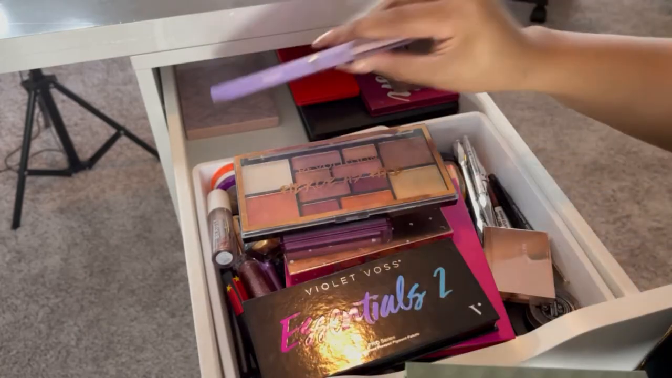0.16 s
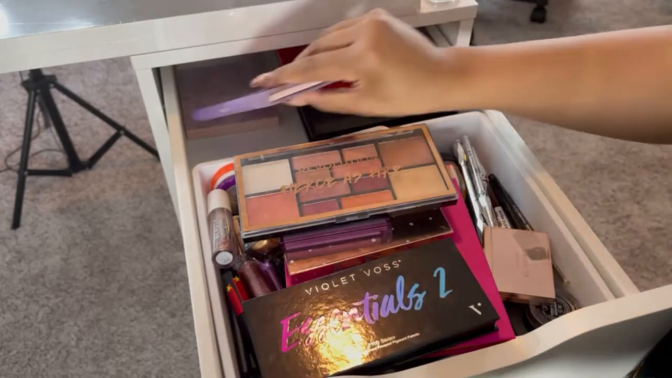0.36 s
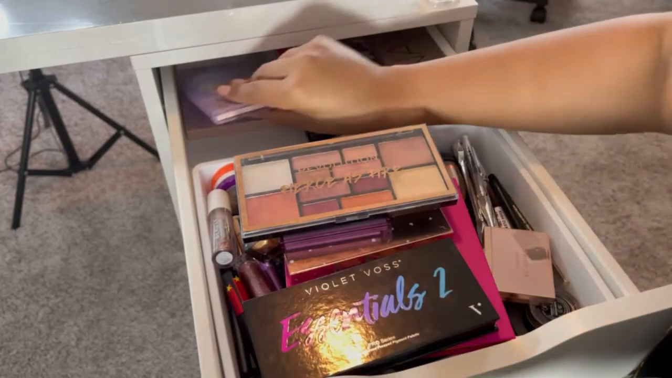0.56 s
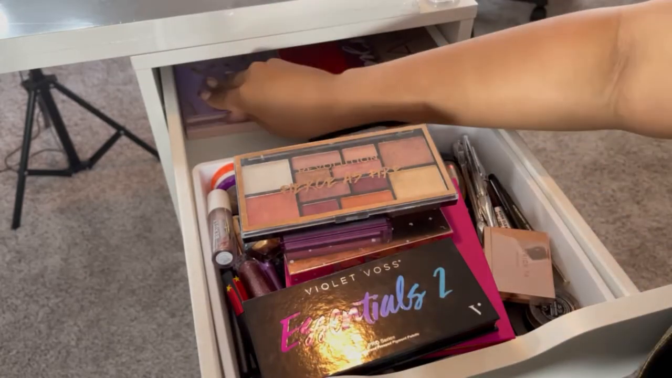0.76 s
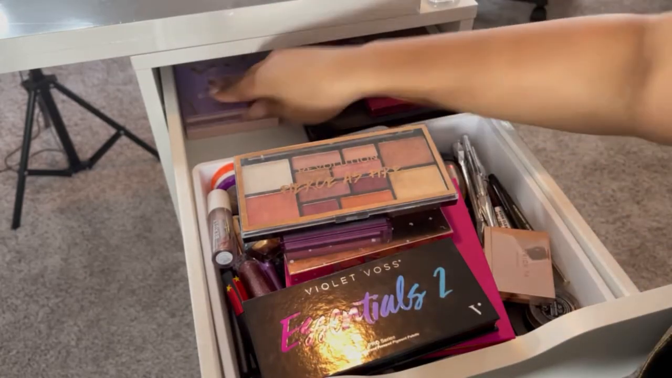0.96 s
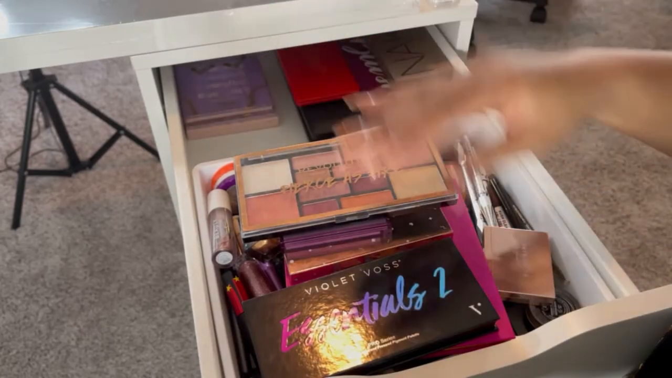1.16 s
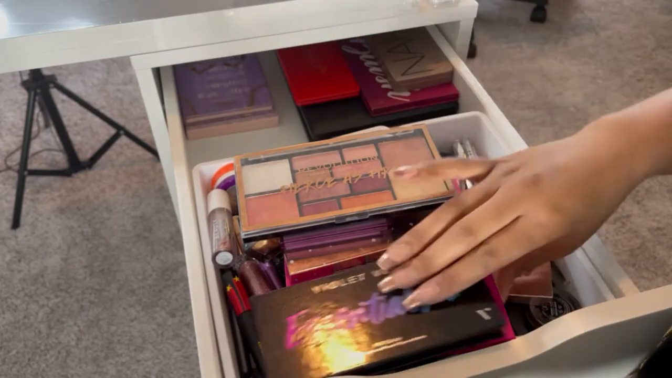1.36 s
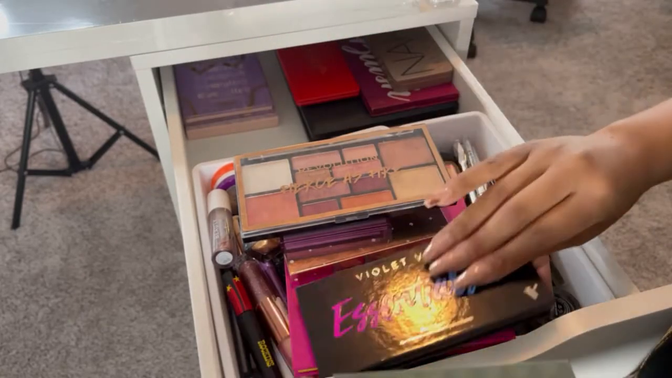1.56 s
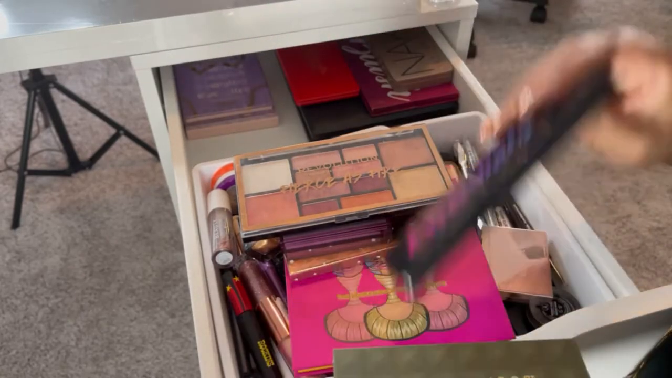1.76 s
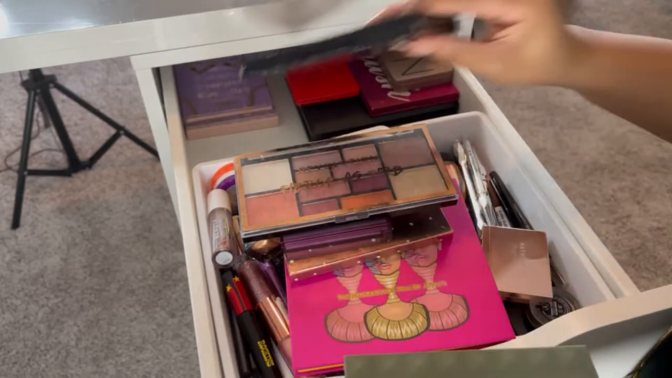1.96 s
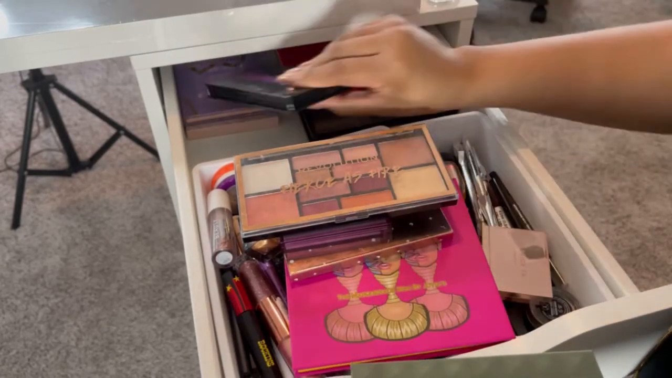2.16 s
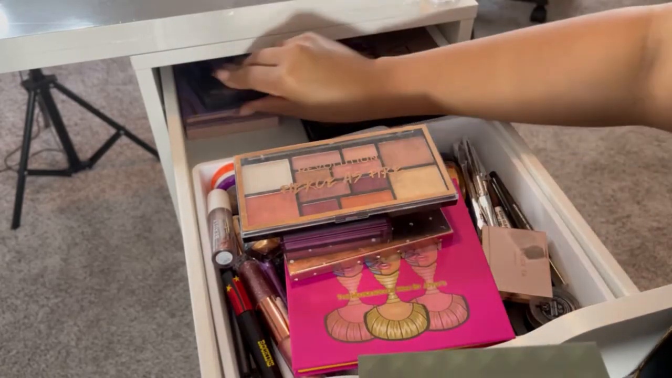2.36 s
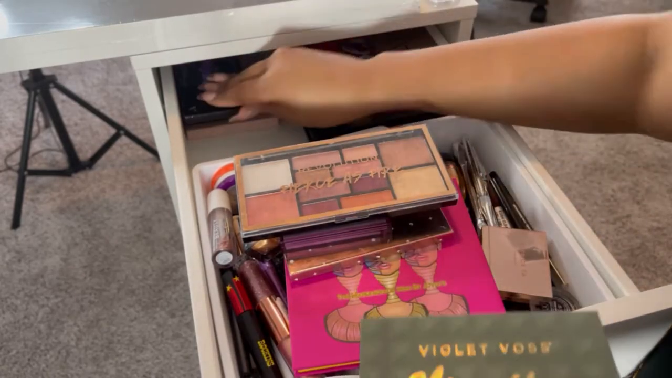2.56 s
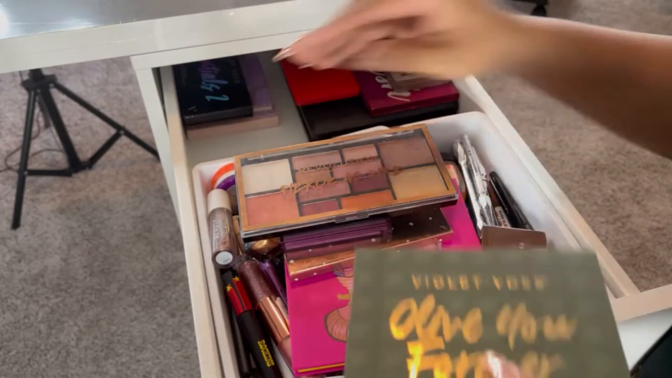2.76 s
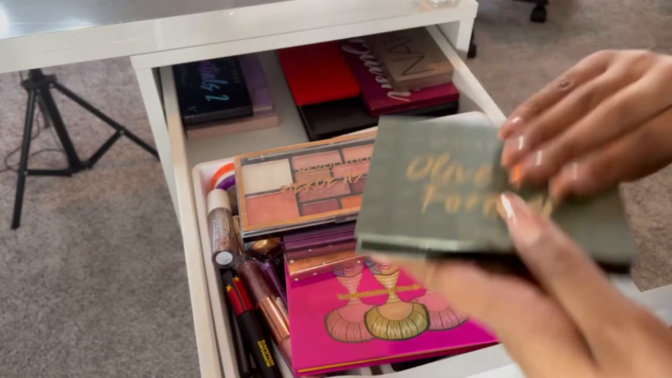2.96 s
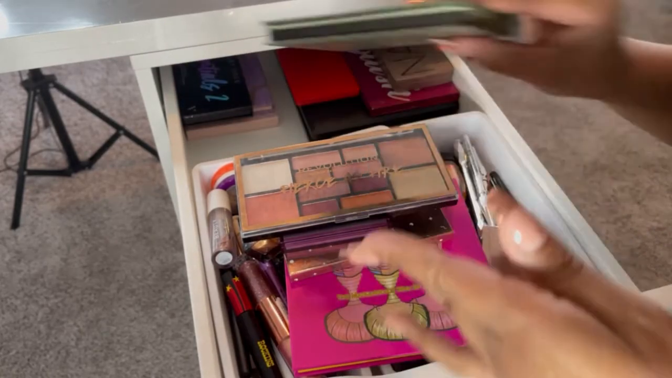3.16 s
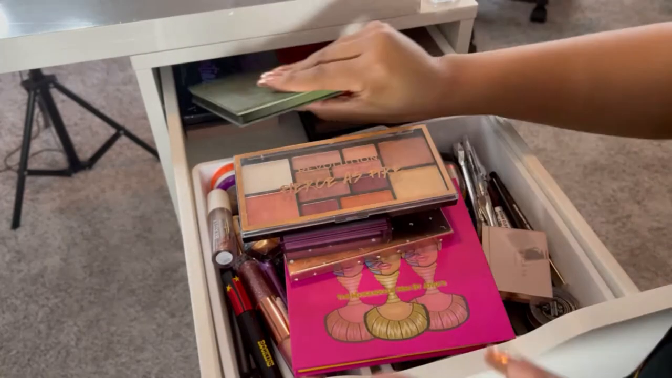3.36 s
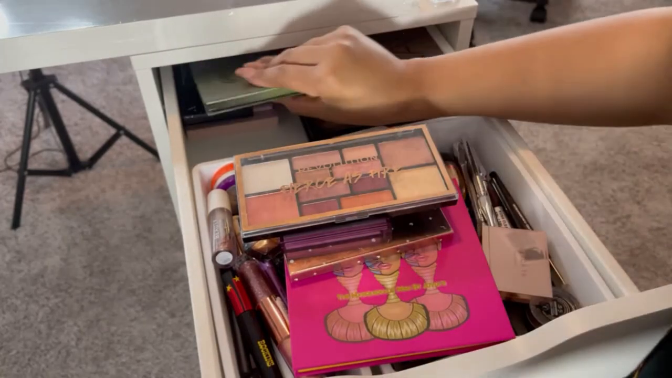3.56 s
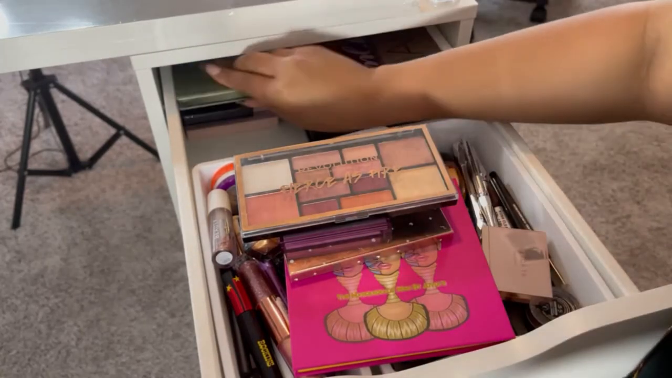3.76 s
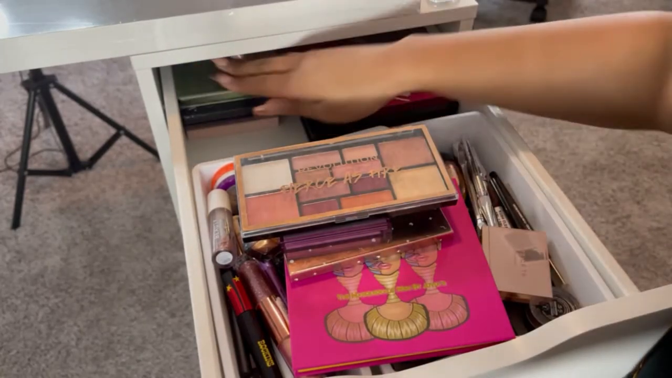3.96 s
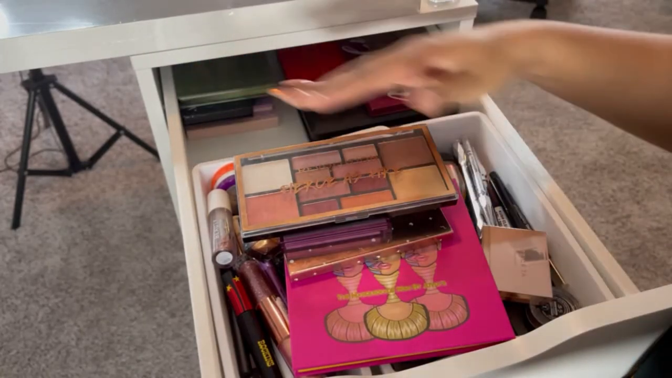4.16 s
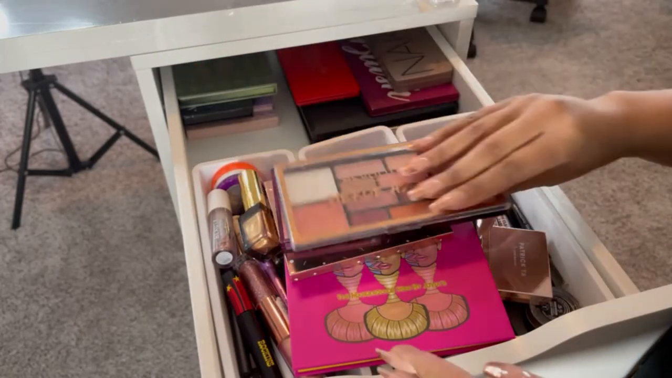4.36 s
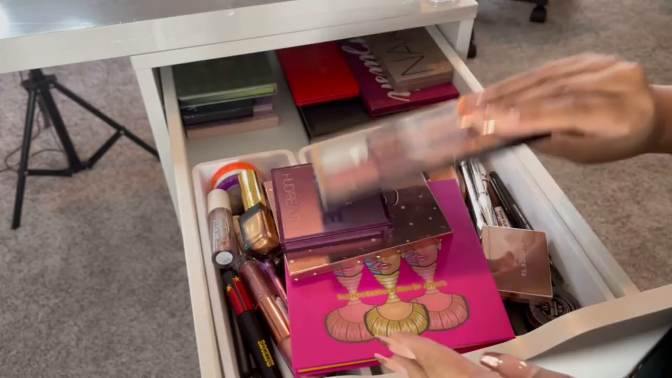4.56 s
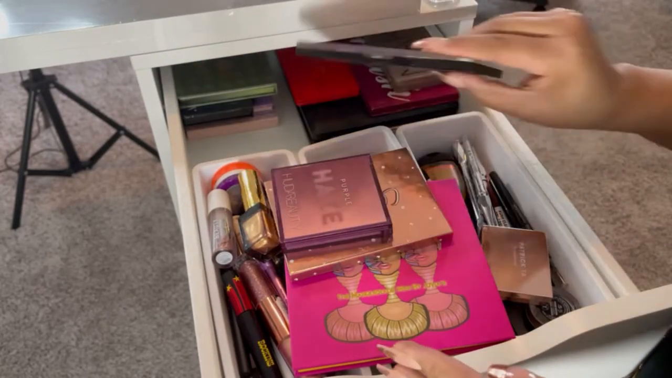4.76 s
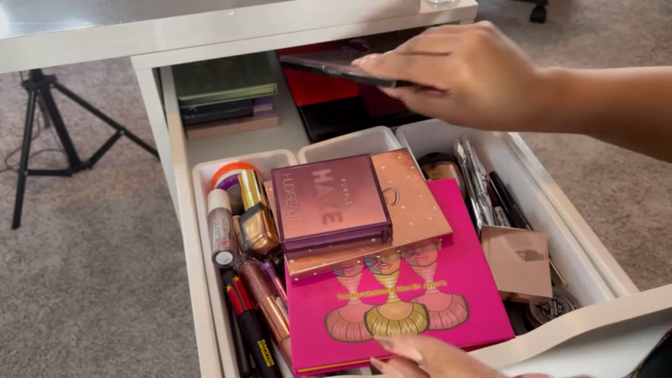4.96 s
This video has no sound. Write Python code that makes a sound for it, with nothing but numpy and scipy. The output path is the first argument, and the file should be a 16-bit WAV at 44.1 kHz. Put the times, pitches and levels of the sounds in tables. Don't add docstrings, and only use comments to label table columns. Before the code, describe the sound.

Plastic and card cases tick, knock hollowly and slide briefly as they are stacked at the back of a thin wooden drawer. Three strong landings are separated by quieter tray clatter and pauses. Low drawer-bottom booms follow the bright edges, with a short boxy echo and faint room tail. Close handheld-style stereo pickup, low hum and hiss, no speech.

```python
import sys
import numpy as np
from scipy import signal
from scipy.fft import rfft, irfft, next_fast_len
from scipy.io import wavfile
from scipy.ndimage import uniform_filter1d

SR = 44100
rng = np.random.default_rng(int(sys.argv[2]) if len(sys.argv) > 2 else 0)


def digitize_waveform(pressure):
    field = np.atleast_2d(pressure).T
    bounded = np.clip(field, -1, 1)
    quanta = np.round(bounded * 32767).astype(np.int16)
    wavfile.write(sys.argv[1], SR, quanta)


def voltage_ratio(decibels):
    exponent = np.asarray(decibels, float) / 20
    return 10 ** exponent


N = 224865
SIZE = next_fast_len(N + SR // 2)
HZ = np.arange(SIZE // 2 + 1) * SR / SIZE + 1e-3

# (pitch [Hz], level [dB per Hz])
AIR_SPECTRUM = [(24, -34), (40, 2), (166, -19.5), (233, -25.5), (276, -20), (516, -29), (641, -30.5),
                (1040, -34.5), (4000, -39.5), (10000, -40.5), (11300, -37.5), (12800, -45), (16600, -65),
                (22000, -120)]
# (pitch [Hz], level [dB per Hz])
EDGE_SPECTRUM = [(900, -7), (1500, 0.5), (3000, -3.5), (6000, -8), (8000, -14.5), (10500, -1.5),
                 (11700, -7), (12400, -16), (15200, -18), (17000, -58.5)]
# (time [s], peak level [dB], treble over mid [dB], contact [ms])
SET_TICKS = [(0.5077, -47, 2.5, 11.4), (0.5399, -22.5, -11.5, 9.6), (0.5449, -16, -11, 7.6),
             (0.5752, -1.5, -8.5, 1.32), (0.5816, -4.5, -9, 1.24), (0.6569, -23, -14, 1.1),
             (0.6823, -31, -13.5, 4.2), (0.7428, -19.5, -12.5, 2.6), (0.8384, -13.5, 3.5, 0.65),
             (0.8462, -12.5, -6, 2.6), (0.8545, -8, -9, 5), (0.8588, -11, -12, 3.1),
             (2.3169, -28.5, -3.5, 9.3), (2.3302, -26.5, -16, 4.5), (2.393, -30, -10.5, 3.8),
             (2.4358, -33.5, -5, 2.8), (2.4518, -37.5, 1.5, 2.9), (2.4594, -24, -4.5, 2.2),
             (2.5597, -4, -19, 3.6), (2.5735, -9.5, -12, 3.2), (3.6641, -29, -9, 3.3),
             (3.7683, -24.5, -0.5, 2), (3.8038, -26, -12, 3.8), (3.845, -23, -10.5, 7.7),
             (3.9174, -25.5, -12.5, 8.6), (3.921, -18, -7, 9.5), (3.928, -6.5, -6, 2.9),
             (4.9583, -49, -2, 3.1), (4.9798, -49.5, -14.5, 3.9), (5.0494, -32, -23.5, 8.4)]
# (time [s], peak level [dB], treble over mid [dB], contact [ms])
LIFT_TICKS = [(0.0104, -39, -10, 3), (0.182, -41, -11, 1.5), (1.1087, -59, -3.5, 3.6),
              (1.341, -37.5, -17, 3), (1.3454, -24.5, -16.5, 5.1), (1.3544, -26, -18.5, 1.5),
              (1.3856, -17, -6, 4), (1.4556, -17, -21, 1.5), (1.5092, -16.5, -5.5, 2.6),
              (1.6102, -21.5, -16.5, 6.7), (1.6156, -20, -27.5, 3.8), (1.6222, -17, -18, 2),
              (1.6385, -15, -9, 2.3), (1.8972, -23, -7, 1.3), (2.9831, -35, 4, 2.6),
              (2.9909, -32, -2.5, 1.9), (3.0133, -45.5, 7, 3), (3.1304, -60, 3, 3.2),
              (3.198, -54.5, -26, 2.4), (4.2969, -33.5, 2, 2.4), (4.3318, -41.5, 0, 4.1),
              (4.3826, -25, -8.5, 2.2), (4.389, -20, -20, 2.3), (4.4468, -37, -11.5, 3.3),
              (4.4762, -34, -13.5, 2.05), (4.4902, -6, -15.5, 3), (4.6112, -22.5, -5.5, 3.3),
              (4.782, -41.5, 1, 4.2)]
# (time [s], peak level [dB], treble over mid [dB], contact [ms])
GRAZES = [
    (2.5625, -20.5, -22, 1),
    (1.4645, -28, -2.5, 1.7),
    (1.4, -32.5, -22, 2),
    (1.5, -40, -23, 1.7),
    (2.594, -18, -11.5, 1.9),
    (1.4, -42, -9, 2),
    (2.594, -22, -19, 2),
    (0.8465, -26.5, 8, 2.2),
]
# (pitch [Hz], t60 [s])
DRAWER_T60 = [(100, 0.31), (500, 0.11), (2000, 0.098), (10000, 0.041)]
# (pitch [Hz], level [dB])
DRAWER_LEVEL = [(100, -3.5), (500, -7.5), (1500, -5), (5000, -5), (12000, -15)]
# (pitch [Hz], t60 [s])
ROOM_T60 = [(60, 0.29), (160, 0.43), (420, 0.47), (1100, 0.57), (2900, 0.38), (7700, 0.37)]
# (pitch [Hz], level [dB])
ROOM_LEVEL = [(80, -15), (300, -9.5), (1000, -12.5), (4000, -8.5), (12000, -23.5)]
# (time [s], peak level [dB], pitch [Hz], t60 [s])
BOUNCES = [(0.183, -46, 1100, .02), (2.505, -24, 800, .04), (2.526, -25, 760, .04), (2.544, -26, 820, .04),
           (3.852, -12, 560, .02), (0.5875, -16, 480, .02), (0.862, -9, 300, .015), (0.865, -9, 294, .05),
           (1.729, -25, 1000, .015), (1.3865, -20, 3300, .012), (4.6128, -27, 4300, .008),
           (4.4925, -24, 3000, .01), (0.8755, -13, 260, .015), (1.7345, -28, 600, .03),
           (1.8995, -40, 4700, .015), (4.392, -28, 900, .015), (4.397, -26, 520, .02),
           (0.868, -10, 520, .03), (2.3285, -15, 480, .02), (1.6125, -24, 420, .03),
           (1.537, -33.5, 520, .04), (1.559, -26, 320, .04), (1.615, -21.5, 1126, .04),
           (1.915, -50.5, 1430, .02), (1.922, -48.5, 1300, .03), (2.484, -14.5, 330, .04),
           (2.594, -12, 260, .02), (1.4555, -13, 700, 0.012), (1.9, -34, 1290, 0.025),
           (2.329, -18, 515, 0.033), (5.06, -32.5, 262, .08), (3.807, -15.5, 565, 0.015),
           (3.821, -11, 340, .05), (3.86, -12.5, 490, .04), (4.336, -37, 1250, .03), (4.402, -30, 466, .03),
           (4.477, -36, 1703, .03), (4.4925, -20, 1500, .012), (4.51, -34, 454, .03)]
# (pitch [Hz], level [dB], t60 [s])
CASE_LOW = [(213.4, -12.5, 0.12), (342, -1.5, 0.042), (505.3, -2, 0.055), (530, -7, 0.064),
            (720, -7.5, 0.041), (854, 0, 0.02)]
# (pitch [Hz], level [dB], t60 [s])
CASE_UPPER = [(913, -9.5, 0.047), (1044, 3.5, 0.03), (1290, -3, 0.068), (1520, -2.5, 0.028),
              (1730, 0, 0.024), (2080, -9.5, 0.087), (2750, -15.5, .02)]
# (time [s], peak level [dB], hollow pitch [Hz], t60 [s])
SET_KNOCKS = [(0.513, -27, 502, 0.19), (0.546, 1, 463, 0.037), (0.58, -5, 495.5, 0.08),
              (0.587, -15, 429.5, 0.078), (0.608, -9, 514, 0.051), (0.679, -15, 520.6, 0.11),
              (0.75, -21, 540, 0.13), (0.841, -0.5, 546, 0.02), (0.855, -7, 1400, 0.032),
              (0.856, -9, 414, 0.02), (0.861, -8.5, 494, 0.033), (0.876, -22.5, 574.6, 0.021),
              (2.318, -18.5, 494, 0.069), (2.322, -11.5, 509, 0.02), (2.333, -15, 392, 0.025),
              (2.462, -4.5, 556, 0.022), (2.476, -6, 358, 0.097), (2.56, 5, 611.5, 0.016),
              (2.565, -6.5, 400, 0.05), (2.5704, -11, 490, 0.028), (2.5771, -12.5, 491, 0.024),
              (3.665, -18, 382.5, 0.037), (3.774, -17, 533, 0.043), (3.806, -8.5, 419.4, 0.12),
              (3.851, -2, 527.5, 0.056), (3.9295, 3, 437.5, 0.054), (3.937, -4, 486, 0.034),
              (4.956, -48, 913, 0.063), (4.981, -27, 286, 0.067), (5.053, -19, 522, 0.032)]
# (time [s], peak level [dB], hollow pitch [Hz], t60 [s], upper modes level [dB])
LIFT_KNOCKS = [(3.2, -46.5, 1396, 0.0045, -20), (1.347, -13, 603, 0.048, -23.5),
               (1.388, -13.5, 1299, 0.086, -10), (1.403, -15.5, 1132, 0.079, -17),
               (1.414, -19.5, 1312, 0.087, -16), (1.428, -18.5, 1300, 0.11, -16),
               (1.459, -24, 600, 0.03, -14.5), (1.4873, -16, 342, 0.032, -4),
               (1.512, -11.5, 1740, 0.034, -17), (1.515, -14, 544, 0.037, -7.5),
               (1.623, -13, 608, 0.013, -8), (1.626, -11, 272, 0.019, -12), (1.6397, -10, 1370, 0.014, -5),
               (1.733, -24, 570, 0.021, -17), (1.9, -44.5, 1382, 0.026, -28.5),
               (2.985, -25.5, 291, 0.014, -25.5), (4.297, -23, 241.5, 0.04, -18),
               (4.299, -17.5, 1230, 0.015, -13), (4.384, -11.5, 1465, 0.028, -6),
               (4.395, -27, 334, 0.024, -26), (4.493, -17.5, 470, 0.055, 1.5),
               (4.6125, -24, 1460, 0.012, -10.5), (4.782, -45.5, 1297, 0.12, -7)]
# (time [s], peak level [dB], pitch [Hz])
BOOMS = [(0.524, -9.5, 104.2), (0.572, -15, 100.7), (0.599, -22.5, 96.9), (0.67, -20, 98),
         (0.841, -11, 111.1), (0.874, -27, 146.3), (1.349, -24.5, 132.5), (1.491, -26, 110.6),
         (1.632, -43, 178), (1.697, -36.5, 88.6), (1.768, -59, 103), (2.324, -25.5, 135),
         (2.39, -33.5, 71.1), (2.473, -9.5, 96.2), (2.515, -45.5, 98.8), (2.577, -8.5, 97.9),
         (2.989, -45, 135.3), (3.676, -25, 105), (3.778, -20.5, 112.5), (3.819, -3.5, 99),
         (3.868, -2, 96.5), (3.902, -19, 95.2), (3.925, -24, 123.4), (3.956, -10, 97.9),
         (4.304, -28, 127.7), (4.391, -30.5, 106.1), (4.495, -32, 70.8), (4.989, -41.5, 106),
         (5.058, -36, 117)]
# (time [s], peak level [dB], pitch [Hz], held [s], flutter [0-1])
HELD = [
    (1.4868, -19.5, 325, .012, 0.2),
    (1.623, -22, 293, .010, 0.6),
    (2.5635, -7, 497, .020, 0.2),
    (0.8605, -6.5, 470, 0.0069, 0),
    (4.4925, -22, 491, 0.0071, 0),
    (0.5475, -15.5, 550, 0.0027, .2),
]
# (pitch [Hz], level [dB per Hz])
RUB_SPECTRUM = [(2000, -32), (3500, -13.5), (5400, -3.5), (7200, -8), (9000, -1.5), (10500, 6),
                (11700, -2.5), (12400, -26), (16000, -54)]
# (start time [s], length [s], treble rub level [dB], body rub level [dB], level change over the
# stroke [dB])
SLIDES = [(0.613, 0.12, -41, -24, -9.5), (0.761, 0.044, -49, -39.5, 1), (1.357, 0.03, -55, -35, -4.5),
          (1.403, 0.049, -45.5, -22.5, -8.5), (1.467, 0.036, -50.5, -43, 9),
          (1.54, 0.11, -77.5, -28.5, -11), (1.662, 0.088, -43, -29, -11.5), (1.696, 0.11, -40, -39, -23),
          (1.92, 0.035, -66, -54.5, -9), (2.251, 0.067, -72.5, -74, 19.5), (2.341, 0.069, -42, -32.5, -7.5),
          (2.418, 0.03, -49, -48, 10), (2.472, 0.15, -44, -31.5, -7), (2.914, 0.096, -69, -64.5, 13),
          (3.019, 0.053, -51, -68, 8), (3.094, 0.056, -64.5, -94, -14), (3.465, 0.6, -91, -63, 8),
          (3.665, .16, -65, -63.5, 19), (3.868, 0.083, -44, -31.5, 2), (4.219, 0.051, -81.5, -64, 14.5),
          (4.306, 0.085, -50, -41.5, 2), (4.419, 0.066, -43.5, -31.5, -8), (4.512, 0.085, -46.5, -32.5, -1),
          (4.639, 0.087, -50, -67, -41), (5.08, 0.034, -95, -37, -3)]
# (start time [s], end time [s])
TRAY_SCRAPES = [
    (1.85, 2.1),
    (4.48, 4.7),
]
# (pitch [Hz], level [dB])
TRAY_LIFT = [(400, -22), (800, -6.5), (1400, 7.5), (2000, -7), (3000, 7.5), (5000, 5)]
# (pitch [Hz], likeness [0-1])
LIKENESS = [(70, .998), (200, .92), (500, .75), (1500, .45), (7600, .35), (8700, .9), (9700, .997),
            (10500, .997), (12500, .9)]
# (pitch [Hz], left lead [rad])
PORT_PHASE = [(0, 0), (1500, .2), (8300, 0), (9850, -2.9), (10300, -3.3), (12100, -6.3), (12900, -7.2),
              (13400, -9.4), (14600, -12.6), (22050, -12.6)]
# (pitch [Hz], level [dB])
PORT_BALANCE = [(60, -2.5), (400, 4.5), (2000, 2), (9000, 2), (12000, 0.2)]

AIR_DB = -57
SHELL_HZ, SHELL_SPREAD = 1500, 0.041
TICK_PAN_DB, SET_PAN_DB, LIFT_PAN_DB, PAN_SPREAD_DB = -1.5, -1.5, 1, 3
THIN_CASE_DB = 20
MODE_SPREAD_DB = 2.5
SET_UPPER_DB = -19.5
BOOM_CYCLES, PRESS_CYCLES_PER_DB = 17.2, 0.06
SAG, SAG_S, DAMP_S, FLUTTER_HZ = 0.8, 0.0019, 0.002, 96
HELD_ROOM_DB = -3.5
GRIP_S, LET_GO_S = 0.021, 0.024
SNAGS_PER_S, SNAG_DB, SNAG_S = 20, 3, 0.00053
MIC_LOW_CUT_HZ, MIC_TOP_HZ, MIC_OVERTONE_HZ = 63.7, 11510, 15200


def rms_one(x):
    return x / np.sqrt(np.mean(x ** 2) + 1e-20)


def at_hz(points, hz):
    point_hz, value = np.transpose(points)
    return np.interp(np.log(hz), np.log(point_hz), value)


def colour(x, response):
    return irfft(rfft(x, SIZE) * response, SIZE)[..., :N]


def add(out, s, wave, pan_db):
    i = round(s * SR)
    sides = voltage_ratio(np.array([[pan_db / 2], [-pan_db / 2]]))
    out[:, i:i + wave.shape[-1]] += wave[..., :N - i] * sides


def placed(rows, pan_db):
    return pan_db + PAN_SPREAD_DB * rng.standard_normal(len(rows))


def noise_pair(spectrum, near=1):
    white = rng.standard_normal((3, N))
    alike = np.clip(at_hz(LIKENESS, HZ), 0, 1) ** near
    gain = voltage_ratio(at_hz(spectrum, HZ))
    shared = colour(white[0], gain * np.sqrt(alike))
    separate = colour(white[1:], gain * np.sqrt(1 - alike))
    return rms_one(shared + separate)


def mode(t, hz, t60, rise_s, phase=0):
    t = np.maximum(t - 0.77 / hz, 0)
    swell = 1 - np.exp(-t / rise_s)
    decay = voltage_ratio(-60 * t / np.clip(t60, 0.005, 1))
    return swell * decay * np.sin(2 * np.pi * hz * t + phase)


def air():
    return voltage_ratio(AIR_DB) * noise_pair(AIR_SPECTRUM)


def ticks():
    out, t = np.zeros((2, N)), np.arange(2000) / SR
    edge = noise_pair(EDGE_SPECTRUM)
    mid = colour(edge, 1 / (1 + (HZ / 4500) ** 4))
    treble, mid = rms_one(edge - mid), rms_one(mid)
    rows = SET_TICKS + LIFT_TICKS
    rings = SHELL_HZ * np.exp(SHELL_SPREAD * rng.standard_normal(len(rows)))
    pans = placed(rows, TICK_PAN_DB)
    rows = rows + GRAZES
    rings, pans = np.resize(rings, len(rows)), np.resize(pans, len(rows))
    for k, (row, ring_hz, pan_db) in enumerate(zip(rows, rings, pans)):
        s, peak_db, treble_db, ms = row
        cut = slice(2000 * k, 2000 * (k + 1))
        fade = np.exp(-t * 1000 / max(ms * 0.88, 0.2)) * np.minimum(t / 0.00065, 1)
        fade *= 1 + 0.17 * np.exp(-t / 0.00034)
        ping = mode(t, ring_hz, 0.018, 0.00021)
        chatter = fade * (mid[:, cut] + voltage_ratio(treble_db + 9) * treble[:, cut])
        add(out, s, voltage_ratio(peak_db - 10.5) * ping, pan_db)
        add(out, s, voltage_ratio(peak_db - 7.0) * chatter, pan_db)
    return out


def stored(power, t60):
    keep = voltage_ratio(-120 / t60 / SR)
    fill = np.exp(-1 / (0.004 * SR))
    return signal.lfilter([(1 - keep) * (1 - fill)], np.convolve([1, -keep], [1, -fill]), power)


def room(x):
    out = 0
    edges = 45 * 2 ** np.arange(0, 8.6, 1 / 3)
    field = [noise_pair([(20, 0), (20000, 0)]) for _ in range(2)]
    for k, (low, high) in enumerate(zip(edges, edges[1:])):
        hz = np.sqrt(low * high)
        band = signal.butter(2, [low, high], "band", fs=SR, output="sos")
        power = signal.sosfilt(band, x) ** 2
        energy = voltage_ratio(2 * at_hz(ROOM_LEVEL, hz)) * stored(power, at_hz(ROOM_T60, hz))
        energy += voltage_ratio(2 * at_hz(DRAWER_LEVEL, hz)) * stored(power, at_hz(DRAWER_T60, hz))
        out = out + np.sqrt(np.abs(energy)) * rms_one(signal.sosfilt(band, field[k % 2]))
    return out


def bounces():
    out, t = np.zeros((2, N)), np.arange(6000) / SR
    for s, peak_db, hz, t60 in BOUNCES:
        note = mode(t, hz, t60, 0.00044)
        partial = mode(t, 2.2 * hz, t60, 0.0005)
        add(out, s - 0.002, voltage_ratio(peak_db) * (note - voltage_ratio(-11.5) * partial), LIFT_PAN_DB)
    return out


def knocks():
    out, t = np.zeros((2, N)), np.arange(6000) / SR
    rows = [row + (SET_UPPER_DB,) for row in SET_KNOCKS] + LIFT_KNOCKS
    pans = np.r_[placed(SET_KNOCKS, SET_PAN_DB), placed(LIFT_KNOCKS, LIFT_PAN_DB)]
    modes = CASE_LOW + CASE_UPPER
    chance = rng.standard_normal((len(rows), 3, len(modes)))
    ports = np.array([[1], [-1]])
    for row, pan_db, (strength, detune, skew) in zip(rows, pans, chance):
        s, peak_db, hz, t60, upper_db = row
        low_db = 0.17 * upper_db - 0.5 - THIN_CASE_DB * (hz > 800)
        wave = mode(t, hz, t60, 0.00044, 0.68 * skew[0] * ports)
        for k, (mode_hz, mode_db, mode_t60) in enumerate(modes):
            share_db = upper_db if k >= len(CASE_LOW) else low_db
            gain = voltage_ratio(mode_db + share_db + MODE_SPREAD_DB * strength[k]) * (-1) ** k
            phase = skew[k] * ports * min(mode_hz / 1800, 0.55)
            wave += gain * mode(t, mode_hz * (1 + 0.05 * detune[k]), mode_t60, 0.0016, phase)
        add(out, s - 0.002, voltage_ratio(peak_db - 4.5) * wave, pan_db)
    return out


def booms():
    out, t = np.zeros((2, N)), np.arange(16000) / SR
    for s, peak_db, hz in BOOMS:
        t60 = (BOOM_CYCLES - PRESS_CYCLES_PER_DB * peak_db) / hz
        wave = mode(t, hz, t60, 0.0064)
        wave += voltage_ratio(-9.5) * mode(t, 0.58 * hz, t60, 0.027)
        wave -= voltage_ratio(-10.0) * mode(t, 1.8 * hz, t60, 0.017)
        add(out, s - 0.011, voltage_ratio(peak_db + 1.0) * wave, 0)
    return out


def held():
    out, t = np.zeros((2, N)), np.arange(4000) / SR
    for s, peak_db, hz, hold, flutter in HELD:
        turns = hz * (t + SAG * SAG_S * (1 - np.exp(-t / SAG_S)))
        shape = np.minimum(t / 0.00032, 1) * np.exp(-np.maximum(t - hold, 0) / DAMP_S)
        shape *= 1 + np.clip(flutter, 0, 1) * np.cos(2 * np.pi * FLUTTER_HZ * (t - 0.003))
        add(out, s, voltage_ratio(peak_db) * shape * np.sin(2 * np.pi * turns), LIFT_PAN_DB)
    return out


def slides():
    t = np.arange(N) / SR
    grains = uniform_filter1d(rng.standard_normal(N), size=60) * np.sqrt(60)
    catch = voltage_ratio(2.5 * grains)
    snag_size = voltage_ratio(SNAG_DB * np.minimum(rng.exponential(1, N), 3) - 6.5)
    snags = (rng.random(N) < SNAGS_PER_S / SR) * snag_size
    catch *= 1 + signal.lfilter([1], [1, -np.exp(-1 / (SNAG_S * SR))], snags)
    treble = noise_pair(RUB_SPECTRUM)
    body = noise_pair([(250, -26.0), (500, 5.0), (1300, -8.0), (2500, -12.5), (5000, -25.5)])
    in_tray = sum((t > start) & (t < end) for start, end in TRAY_SCRAPES)
    body = np.where(in_tray, colour(body, voltage_ratio(at_hz(TRAY_LIFT, HZ))), body)
    force = np.zeros((2, N))
    for s, length, treble_db, body_db, slowing_db in SLIDES:
        moving = np.clip(np.minimum((t - s) / GRIP_S + 1, (s + length - t) / LET_GO_S + 1.3), 0, 1)
        slowing = slowing_db * np.clip((t - s) / length, 0, 1)
        force += moving * voltage_ratio(slowing + [[treble_db - 1.5], [body_db - 9.0]])
    return (force[0] * treble + force[1] * body) * catch


def scene():
    drawer = ticks() + bounces() + knocks() + booms() + slides()
    pressed = held()
    to_room = (drawer + voltage_ratio(HELD_ROOM_DB) * pressed).mean(axis=0)
    return drawer + pressed + room(to_room) + air()


def low_pass(x):
    return signal.sosfilt(signal.butter(12, 16900, fs=SR, output="sos"), x)


def record(dry):
    balance = voltage_ratio(at_hz(PORT_BALANCE, HZ) / 2)
    half = balance * np.exp(0.5j * np.interp(HZ, *np.transpose(PORT_PHASE)))
    ports = colour(dry, np.array([half, 1 / half]))
    ports = 1.209 * np.tanh(ports / 1.157)
    low_cut = signal.butter(3, MIC_LOW_CUT_HZ, "high", fs=SR, output="sos")
    ports = signal.sosfilt(low_cut, ports)
    top = 0.1 + 0.9 / np.sqrt(1 + (HZ / MIC_TOP_HZ) ** 60)
    overtone = 0.1 * np.exp(-((HZ - MIC_OVERTONE_HZ) / 450) ** 2)
    return low_pass(colour(ports, top + overtone))


dry = scene()
out = record(dry)
digitize_waveform(out)
```